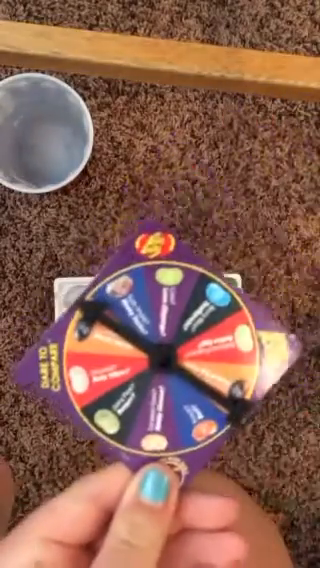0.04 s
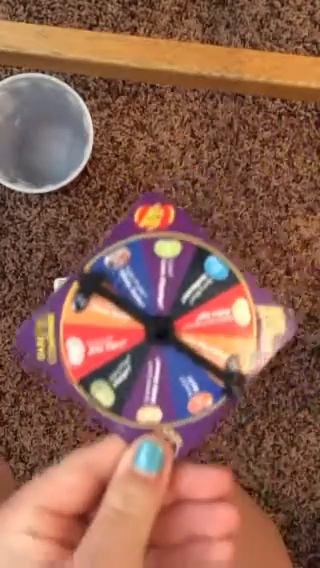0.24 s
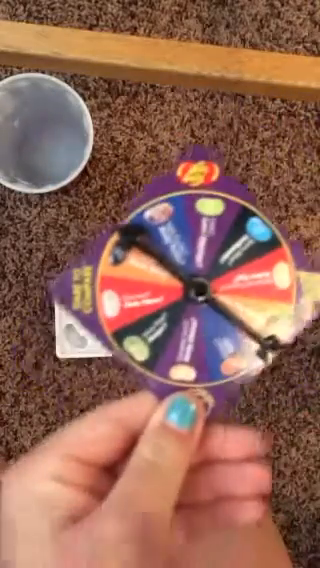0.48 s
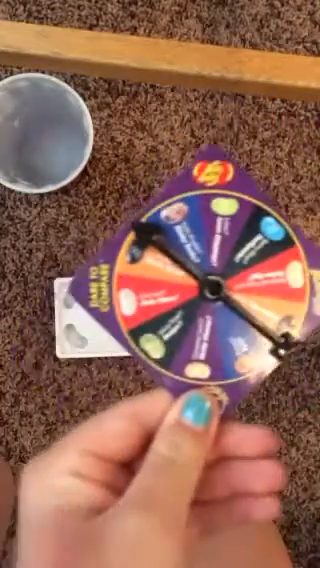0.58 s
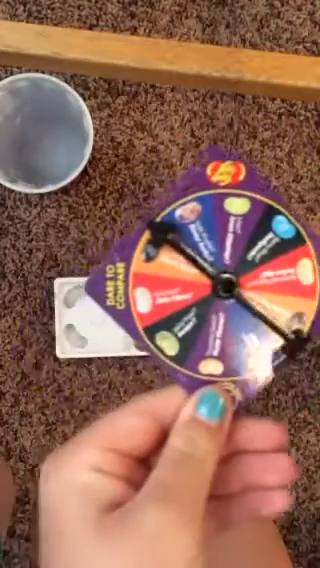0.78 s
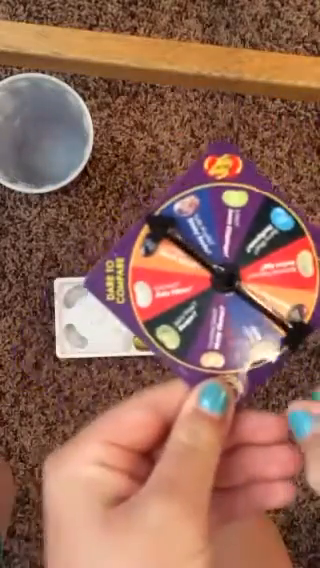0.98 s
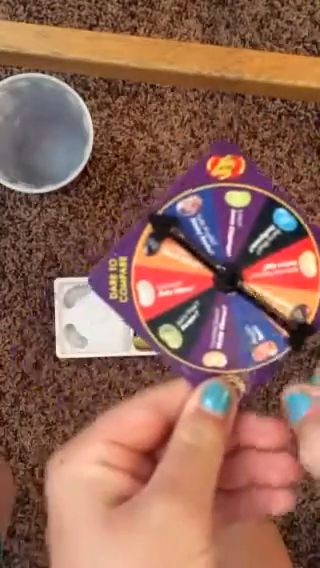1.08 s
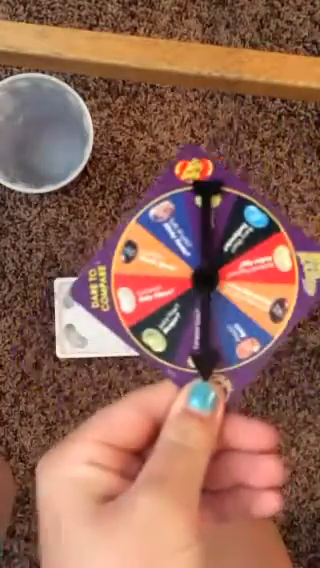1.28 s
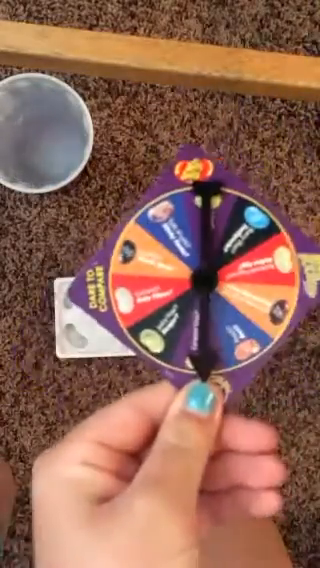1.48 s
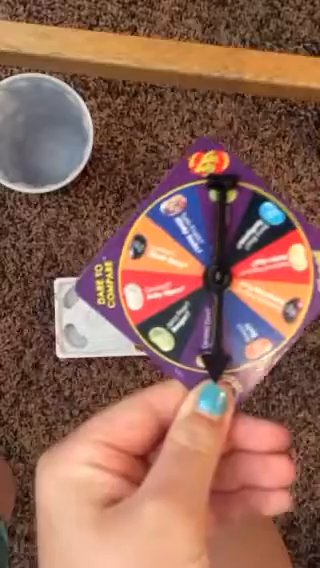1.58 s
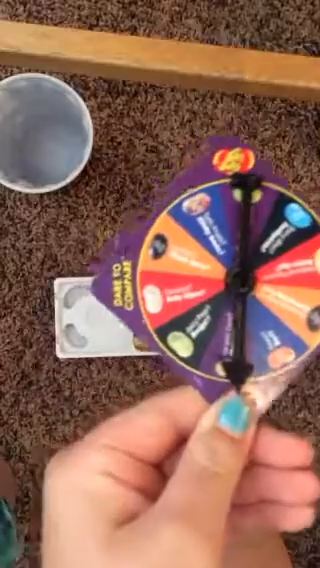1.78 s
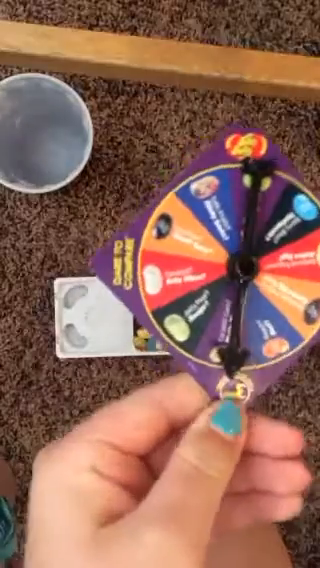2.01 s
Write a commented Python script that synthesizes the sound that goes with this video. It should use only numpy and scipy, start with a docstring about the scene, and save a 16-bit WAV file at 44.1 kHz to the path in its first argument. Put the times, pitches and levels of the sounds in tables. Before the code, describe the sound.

One sharp click of a flicked plastic spinner arrow is the main sound. First a hand faintly rubs the cardboard base, with a soft bump near 0.8 seconds. At about 1.3 seconds a fingernail snaps off the arrow, which rattles for an instant. A few tiny ticks follow from 1.7 to 2 seconds. It is heard close, in a quiet room with a faint low hum and little echo.

```python
"""First you hear a low hum and a faint rush in a quiet carpeted room, and a hand softly rubbing and
bumping a cardboard spinner. At about 1.27 s a fingernail slides off its plastic arrow with a sharp crack.
The arrow chatters on its loose pivot for 40 ms, knocking the card, which rings briefly.
A few tiny ticks from the pivot and the grip follow. The room adds a weak, short echo."""
import sys
import numpy as np
from scipy import signal
from scipy.fft import rfft, irfft, next_fast_len
from scipy.io import wavfile

SR = 44100
rng = np.random.default_rng(int(sys.argv[2]) if len(sys.argv) > 2 else 0)


def log_audio(samples):
    """Write samples as a 16-bit WAV file to the path given in sys.argv[1]."""
    # one column per channel
    frames = np.atleast_2d(samples).T
    # limit to full scale, then quantise
    limited = np.clip(frames, -1, 1)
    pcm = np.round(limited * 32767).astype(np.int16)
    wavfile.write(sys.argv[1], SR, pcm)


N = 90360
T = np.arange(N) / SR  # seconds since the scene began
RING_T = np.arange(8192) / SR  # seconds since one short sound began


def from_db(db):
    """Turn decibels into a number to multiply a sound by."""
    return 10 ** (np.asarray(db) / 20)

def rms_one(x):
    """Scale a signal so that its average strength (rms) is 1."""
    return x / np.sqrt(np.mean(x ** 2) + 1e-20)

def noise(colour, size=N):
    """Noise of strength 1; its colour says how strong each frequency is next to the others."""
    hz, db = np.transpose(colour)
    n = next_fast_len(size)
    freqs = np.maximum(np.arange(n // 2 + 1) * SR / n, 1)
    gain = from_db(np.interp(np.log(freqs), np.log(hz), db))
    return rms_one(irfft(rfft(rng.standard_normal(n)) * gain, n)[:size])

def band_noise(hz, width):
    """A short hiss around one pitch; width is a share of that pitch."""
    edges = np.clip([hz / (1 + width / 2), hz * (1 + width / 2)], 10, SR / 2 - 10)
    band_pass = signal.butter(2, edges, "band", fs=SR, output="sos")
    hiss = signal.sosfilt(band_pass, rng.standard_normal(2 * len(RING_T)))
    return rms_one(hiss[len(RING_T):])

def decay(t, fade_s):
    """Jump to 1 at t = 0, then fade by 60 dB every fade_s seconds."""
    return (t >= 0) * np.exp(-np.log(1000) * np.clip(t / fade_s, 0, 10))

def drift(per_second):
    """A random wander of strength 1 that heads for a new value so many times a second."""
    targets = rng.standard_normal(256)
    return rms_one(np.interp(T * per_second, np.arange(len(targets)), targets))

def swells(rows):
    """A level that rises and falls in one bell shape for each row."""
    power = sum(from_db(db) ** 2 * np.exp(-np.minimum(((T - s) / half) ** 2, 60)) for s, half, db in rows)
    return np.sqrt(power)

def add(out, start_s, sound):
    """Mix a short sound into out, beginning at start_s."""
    i = int(start_s * SR)
    out[i:i + len(sound)] += sound[:max(N - i, 0)]


# The tones of the hum: f/Hz, level/dB
HUM_TONES = [(87, -82.5), (119.5, -70.5), (242, -80.5), (295, -80.5)]
# The colour of the room's air: f/Hz, level/dB
AIR_COLOUR = [(15, -38.5), (25, -3.5), (119, 1.5), (173, -8.5), (349, -3), (509, -15), (895, -14),
              (1170, -18.5), (1530, -18.5), (3630, -25.5), (11200, -29.5), (14300, -28.5), (15500, -35)]
# The colour of the rush: f/Hz, level/dB
RUSH_COLOUR = [(100, -22), (280, 1), (700, -0.5), (1500, -3.5), (2600, -16), (8000, -57)]
# How loud the rush is as time passes: t/s, level/dB
RUSH_LEVELS = [(0, -63.5), (.15, -66.5), (.45, -69), (.6, -64.5), (.72, -78), (.9, -67.5), (1.1, -81),
               (2.05, -87.5)]
def background(hum_swing_db=0):
    """A low hum that wavers in pitch, a faint rush that dies away unevenly and steady room air."""
    hum = np.zeros(N)
    for hz, db in HUM_TONES:
        level = from_db(db + hum_swing_db * drift(27))  # a swing of 0 keeps the level steady
        waver = 0.89 * drift(21)
        hum += level * np.sqrt(2) * np.sin(2 * np.pi * hz * T + waver)
    rush_db = np.interp(T, *np.transpose(RUSH_LEVELS))
    rush = from_db(rush_db) * noise(RUSH_COLOUR)
    air = from_db(-64.5) * noise(AIR_COLOUR)
    return hum + rush + air


# Each rub of the hand: middle t/s, half length/s, level/dB
HAND_RUBS = [(.08, 0.035, -72.5), (.275, 0.016, -70.5), (.34, 0.025, -65.5), (.435, 0.0099, -73),
             (.6, 0.037, -79), (.815, 0.065, -60), (.965, 0.034, -66.5), (1.09, 0.042, -74),
             (2.02, .045, -70.5)]
# The colour of skin on cardboard: f/Hz, level/dB
RUB_COLOUR = [(250, 0.5), (700, -0.5), (1400, 3.5), (2500, -2.5), (5000, -8), (10000, -12), (15000, -17.5)]
def hand_rubs(flicker_db=2.4):
    """Skin rubs on the card in soft, uneven swells as it is moved about."""
    return swells(HAND_RUBS) * noise(RUB_COLOUR) * from_db(flicker_db * drift(44))


# The bump of the hand: t/s, level/dB
HAND_BUMPS = [(0.8257, -41.5)]
def hand_bump(hz=249, width_s=0.002):
    """The soft hand pushes the card for a moment, making one dull, low pulse."""
    out = np.zeros(N)
    for s, db in HAND_BUMPS:
        push = np.exp(-0.5 * ((T - s) / width_s) ** 2)
        out -= from_db(db) * push * np.cos(2 * np.pi * hz * (T - s))
    return out


# Each rub at the pivot: middle t/s, half length/s, level/dB
PIVOT_RUBS = [(1.21, 0.086, -72.5), (1.61, 0.013, -70), (1.74, 0.065, -73)]
# The colour of that rubbing: f/Hz, level/dB
PIVOT_COLOUR = [(1500, -11.5), (4500, 1), (8000, -3), (14000, -2), (16000, -7.5)]
def pivot_friction():
    """The arrow rubs on its dry pivot with a faint, high hiss."""
    return swells(PIVOT_RUBS) * noise(PIVOT_COLOUR)


def nail_scrape(snap_s):
    """The nail squeaks along the arrow, growing louder until it snaps free at snap_s."""
    rise = decay(RING_T, fade_s=0.023)[::-1]  # a fade played backwards
    out = np.zeros(N)
    add(out, snap_s - RING_T[-1], from_db(-33) * rise * band_noise(hz=4030, width=0.14))
    return out


# The colour of a dry crack: f/Hz, level/dB
SNAP_COLOUR = [(250.0, -33.9), (560.0, -24.2), (900.0, -0.2), (1500.0, 0.7), (2200.0, -4.6), (4400.0, -3.2),
               (6500.0, -0.6), (9000.0, -6.3), (12500.0, -7.2), (14500.0, -5.4), (16000.0, -18.3)]
def crack(top_hz, low_hz=650):
    """A hit gives a dry snap and leaves a short buzz in the pivot; a lower top_hz sounds duller."""
    snap = decay(RING_T, fade_s=0.0065)
    buzz = from_db(-20) * decay(RING_T, fade_s=0.042)
    burst = np.hypot(snap, buzz) * noise(SNAP_COLOUR, size=len(RING_T))
    # Cut the lows below low_hz so the crack sounds thin and dry.
    thin_burst = signal.lfilter(*signal.butter(2, low_hz, "high", fs=SR), burst)
    return signal.lfilter(*signal.butter(1, top_hz, fs=SR), thin_burst)

def ring(tones):
    """A knocked object rings with several tones at once, each fading at its own speed."""
    return sum(from_db(db) * decay(RING_T, fade_s) * np.sin(2 * np.pi * hz * RING_T)
               for hz, db, fade_s in tones)


# The low tones of the card bending: f/Hz, level/dB, fade time/s
BEND_TONES = [(192.0, -8.7, 0.039), (253.0, -2.5, 0.027), (323.0, -4.9, 0.034), (386.0, -14.0, 0.046)]
# The tones of the card ringing: f/Hz, level/dB, fade time/s
CARD_TONES = [(650, -25, 0.019), (880, -21, 0.0065), (975, -13.5, 0.059), (1110, 1.2, 0.021),
              (1330, -2.1, 0.026), (1415, -2.5, 0.06), (1530, -17.5, 0.032), (1793, -14.5, 0.04),
              (2100, -18, 0.064), (2340, -14.5, 0.031), (2610, -6.5, 0.017)]
# The tones of the arrow ringing: f/Hz, level/dB, fade time/s
ARROW_TONES = [(3183.0, -10.2, 0.027), (3547.0, -7.1, 0.049), (4026.0, -9.1, 0.027), (4152.0, -6.4, 0.016),
               (4614.0, -6.4, 0.024), (5650.0, -8.5, 0.014), (6174.0, -9.2, 0.031), (7231.0, -10.2, 0.019),
               (8187.0, -13.0, 0.02), (9424.0, -13.8, 0.012), (10645.0, -10.9, 0.015),
               (14177.0, -14.8, 0.008)]
# The flick and the chatter after it, one hit a row:
# t/s, bend level/dB, card level/dB, arrow level/dB, crack level/dB, top of the crack f/Hz
HITS = [(1.27414, -20.1, -16.7, -19.9, -11.8, 14000.0), (1.27655, -38.4, -38.3, -31.5, -27.8, 9300.0),
        (1.28253, -54.4, -46.3, -32.5, -23.5, 16400.0), (1.28367, -45.7, -26.3, -28.2, -23.6, 7300.0),
        (1.28994, -45.5, -33.5, -25.5, -14.9, 16500.0), (1.29086, -51.2, -38.5, -25.5, -22.3, 12000.0),
        (1.30156, -48.7, -28.1, -33.8, -14.2, 5800.0), (1.30279, -52.1, -33.1, -33.6, -28.0, 8100.0),
        (1.3082, -54.1, -47.0, -42.7, -31.5, 13200.0), (1.31345, -50.8, -41.6, -41.7, -37.2, 6100.0),
        (1.31609, -45.8, -39.2, -45.6, -45.1, 4000.0)]
def flick(bass_cut_hz=200):
    """Every hit bends and rings the card, rings the arrow and gives a dry crack."""
    bend, card, arrow = ring(BEND_TONES), ring(CARD_TONES), ring(ARROW_TONES)
    out = np.zeros(N)
    for s, bend_db, card_db, arrow_db, crack_db, top_hz in HITS:
        ringing = from_db(bend_db) * bend + from_db(card_db) * card + from_db(arrow_db) * arrow
        add(out, s, ringing + from_db(crack_db) * crack(top_hz))
    # A small card sends out little bass.
    bass_cut = signal.butter(2, bass_cut_hz, "high", fs=SR, output="sos")
    return signal.sosfilt(bass_cut, out + 1e-18)


# Each tick: t/s, level/dB, f/Hz
TICKS = [(1.711, -57, 13000), (1.724, -58, 12900), (1.7395, -49.5, 9030), (1.822, -68, 14500),
         (1.962, -64.5, 3500), (1.9618, -54, 1460), (2.004, -62, 1800)]
def ticks():
    """The pivot and the grip give tiny ticks, each a quick hiss around one pitch."""
    out = np.zeros(N)
    for s, db, hz in TICKS:
        add(out, s, from_db(db) * decay(RING_T, fade_s=0.014) * band_noise(hz, width=0.23))
    return out


# The colour of the room's echo: f/Hz, level/dB
ECHO_COLOUR = [(150, -14.5), (380, -3), (600, -10.5), (950, -2), (1450, -0.5), (2700, -5), (4300, -8),
               (8000, -9.5), (15000, -17.5)]
def room_echo(sound, delay_s=0.013):
    """Sound bounces quickly off floor and furniture, then lingers in a weaker, longer tail."""
    t = T[:SR // 2]
    echo = np.zeros(len(t))
    for db, fade_s in ((-23.5, 0.1), (-37.5, 0.51)):  # quick bounces, long tail
        bounces = noise(ECHO_COLOUR, size=len(t)) * decay(t - delay_s, fade_s)
        echo += from_db(db) * bounces / np.sqrt(np.sum(bounces ** 2))
    return signal.fftconvolve(sound, echo)[:N]


def scene():
    """The spinner heard up close in its quiet room, in one channel."""
    spinner = flick() + nail_scrape(snap_s=HITS[0][0]) + pivot_friction() + ticks()
    spinner += hand_rubs() + hand_bump()
    return (spinner + room_echo(spinner) + background())[None]

def record(dry, cutoff_hz=15900):
    """Cut away the very highest treble steeply."""
    return signal.sosfilt(signal.cheby2(16, 60, cutoff_hz, fs=SR, output="sos"), dry)


dry = scene()
out = record(dry)
log_audio(out)
```